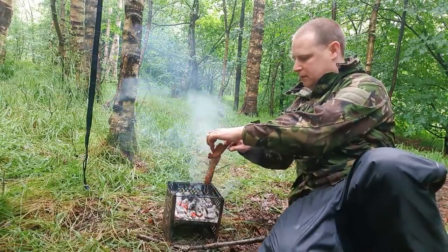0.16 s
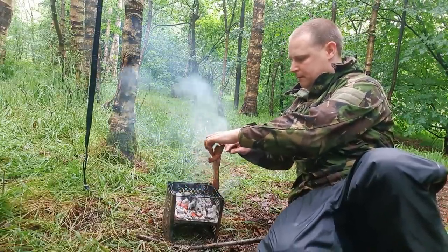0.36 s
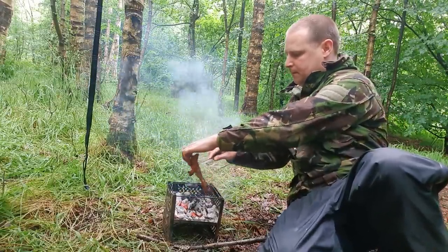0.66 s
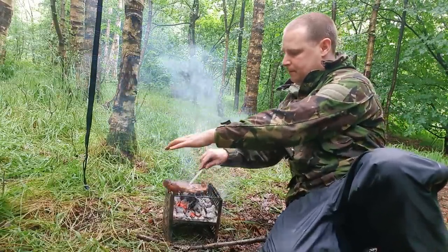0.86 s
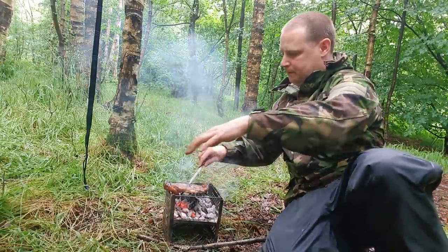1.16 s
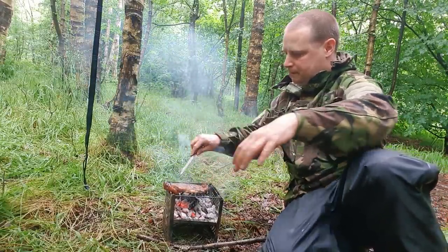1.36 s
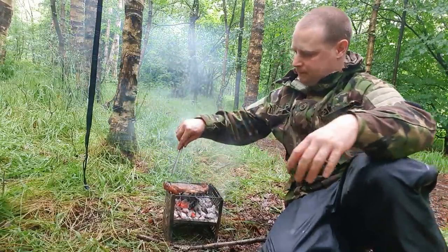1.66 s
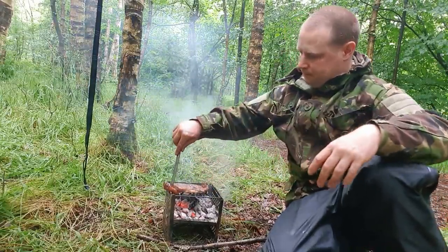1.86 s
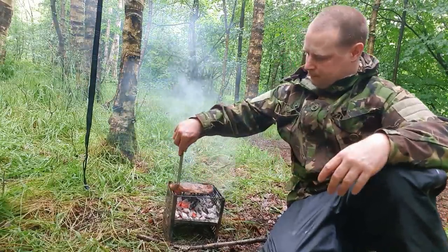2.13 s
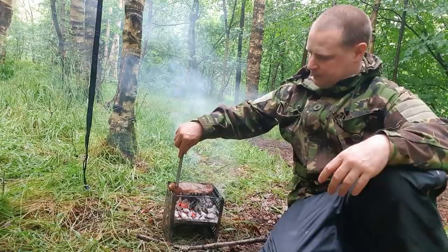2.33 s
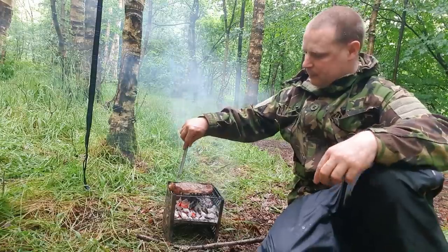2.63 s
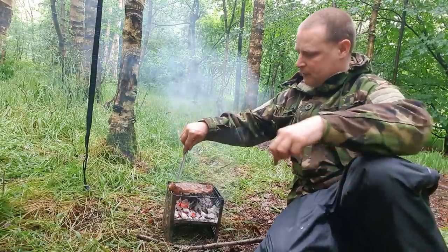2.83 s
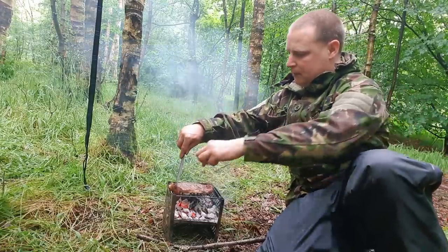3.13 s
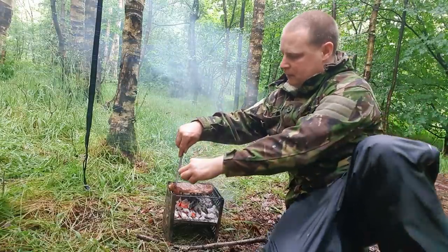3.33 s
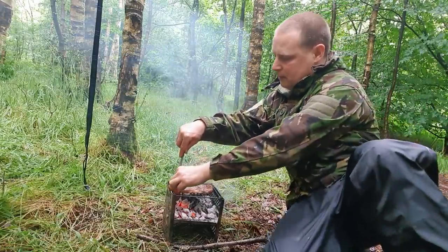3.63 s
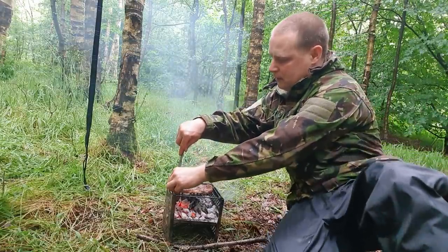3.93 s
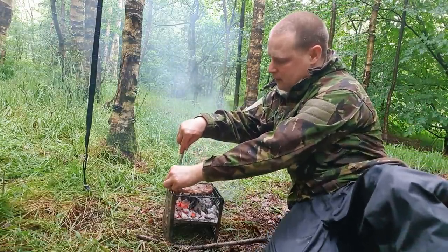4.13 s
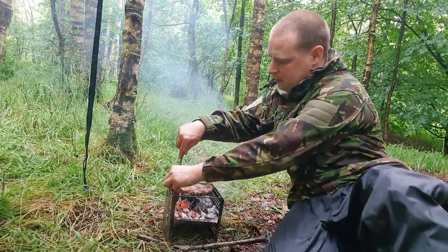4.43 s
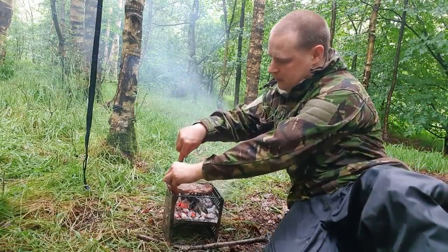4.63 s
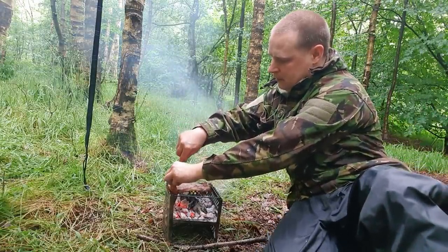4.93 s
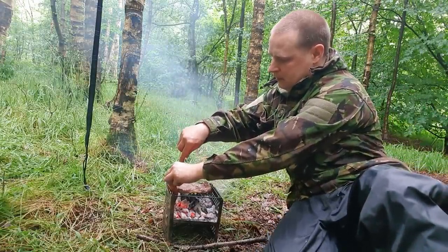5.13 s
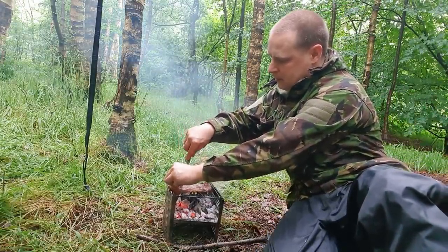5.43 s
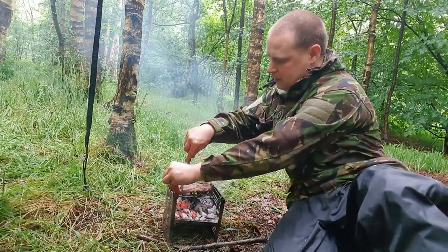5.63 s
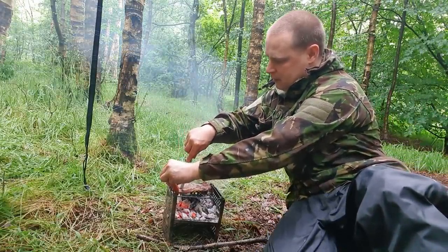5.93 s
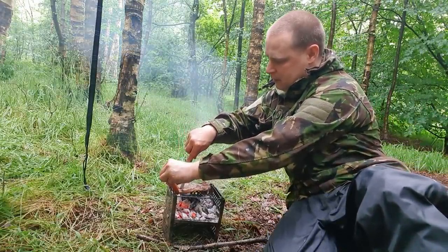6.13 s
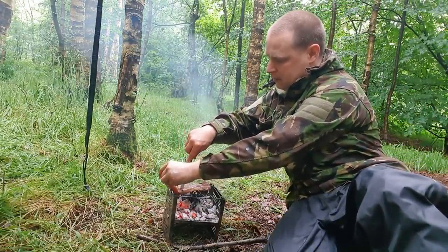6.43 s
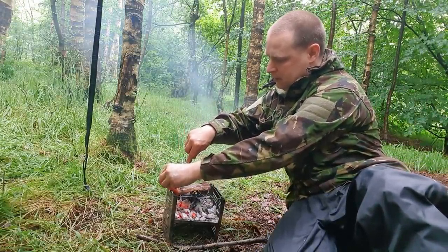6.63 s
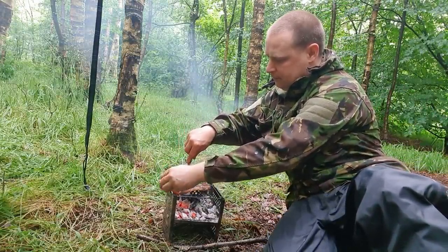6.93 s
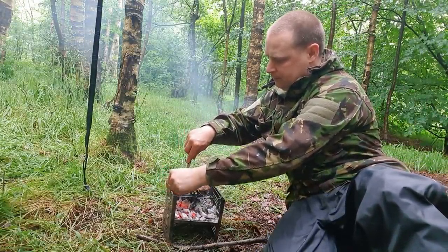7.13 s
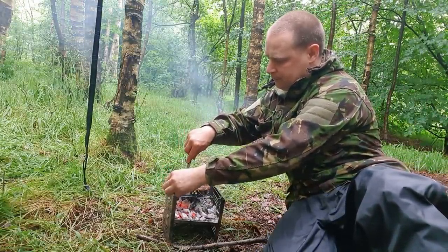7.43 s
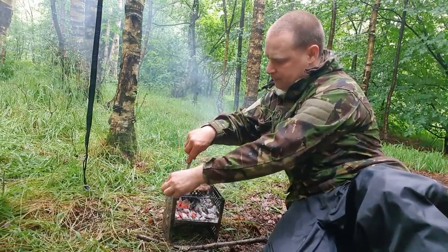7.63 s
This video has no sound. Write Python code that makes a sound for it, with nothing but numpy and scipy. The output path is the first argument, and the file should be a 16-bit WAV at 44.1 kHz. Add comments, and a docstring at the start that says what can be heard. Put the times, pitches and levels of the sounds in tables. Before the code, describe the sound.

Drops from wet trees tap irregularly on a taut tarp just above a stereo microphone in a wood. Beneath them, meat sizzles and spits softly on a small charcoal grill, with faint rain hiss and a far rumble. A soft thud comes early. A sleeve rustles once, and a distant bird whistles a few faint notes, then a few more. The hardest drip lands near the end as the sizzle fades.

```python
"""Drips from wet trees tap on a taut tarp over a stereo microphone in a wood. From the start, fine rain
hisses in the leaves over a far rumble and drone, and meat sizzles and spits on a small charcoal grill.
Something thuds softly at 1.7 s. Just after 3 s a sleeve rustles once and a distant bird whistles a few
notes, then more around 5 s. The hardest drip lands near 6.9 s, as the sizzle sinks away."""
import sys
import numpy as np
from scipy import signal
from scipy.io import wavfile

SR = 44100
rng = np.random.default_rng(int(sys.argv[2]) if len(sys.argv) > 2 else 0)


def generate_wav(signal):
    """Clip the signal to [-1, 1] and save it as 16-bit WAV at the path in sys.argv[1]."""
    frames = np.transpose(np.atleast_2d(signal))
    scaled = np.clip(frames, -1, 1) * 32767
    pcm = np.round(scaled).astype(np.int16)
    wavfile.write(sys.argv[1], SR, pcm)


N = 342657


def from_db(db):
    """Gain of a level in dB."""
    return np.exp(np.asarray(db) * (np.log(10) / 20))


def unit_rms(x):
    """Scaled to rms 1."""
    return x / np.sqrt(np.mean(x ** 2) + 1e-20)


def pan(db):
    """Left and right gains, the left louder by db."""
    return from_db([[db / 2], [-db / 2]])


def butter(x, order, hz, kind):
    """A Butterworth filter."""
    return signal.sosfilt(signal.butter(order, hz, kind, fs=SR, output="sos"), x)


def automation(rows):
    """One curve per column, sample by sample, from rows that begin with a time."""
    times, *columns = np.transpose(rows)
    return [np.interp(np.arange(N) / SR, times, column) for column in columns]


def at_hz(points, hz):
    """A curve read on a log-frequency axis."""
    freqs, values = np.transpose(points)
    return np.interp(np.log(hz), np.log(freqs), values)


def drift(rate_hz):
    """A smooth random wobble with a spread of about 1."""
    step = 40
    pole = np.exp(-2 * np.pi * rate_hz * step / SR)
    slow = signal.lfilter([1], [1, -2 * pole, pole * pole], rng.standard_normal(N // step + 2002))[2000:]
    return np.interp(np.arange(N) / step, np.arange(len(slow)), unit_rms(slow))


def grains(per_s, spread_db):
    """Two unrelated streams of random clicks of uneven size."""
    sizes = from_db(spread_db * np.minimum(rng.exponential(1, (2, N)), 5))
    signs = rng.choice([-1, 1], (2, N))
    return unit_rms(sizes * signs * (rng.random((2, N)) < per_s / SR))


def ring(t, hz, t60, phase):
    """A ringing mode that falls 60 dB in t60 seconds."""
    return np.sin(2 * np.pi * hz * t + phase) * from_db(-60 * t / t60)


# Stereo width of the beds. Each row: frequency in Hz, left-right likeness (1 is mono).
BED_LIKENESS = [(60, 0.91), (130, 0.93), (290, 0.94), (640, 0.45), (1410, -0.071), (3100, -0.058),
                (6820, -0.058), (15000, -0.024)]
# Balance of the beds. Each row: frequency in Hz, left over right in dB.
BED_PAN = [(60, -1.0), (180, -1.5), (550, 0.5), (1650, -0.5), (4970, -2), (15000, -4)]
def noise_bed(sources, spectrum, flicker_db, tilt_db=0):
    """Twenty flickering bands, each with its own level, width and pan; tilt pivots on 8 kHz; rms 1."""
    out, shared_flicker = np.zeros((2, N)), drift(6)
    edges = np.geomspace(max(spectrum[0][0], 25), 17000, num=21)
    for k, (low, high) in enumerate(zip(edges, edges[1:])):
        mid_side = butter(sources[k % 2], 2, [low, high], "band")
        hz = np.sqrt(low * high)
        alike = at_hz(BED_LIKENESS, hz)
        to_stereo = pan(at_hz(BED_PAN, hz)) * np.sqrt([[1 + alike, 1 - alike]]) * [[1, 1], [1, -0.95]]
        band_db = at_hz(spectrum, hz) + tilt_db * np.log2(hz / 8000)
        flicker = shared_flicker / 2 + drift(35)
        out += from_db(band_db + flicker_db * flicker) * (to_stereo @ mid_side)
    return unit_rms(out)


# Tone of the rumble and rain. Each row: frequency in Hz, relative level in dB.
WOOD_SPECTRUM = [(25, -12), (60, 0), (80, -0.5), (140, -14), (250, -2), (400, -8), (600, -10), (1000, -12),
                 (1500, -6), (3660, -9), (7500, -26.5), (9500, -27), (14800, -17), (17000, -42)]
# Their fader. Each row: time in seconds, level in dB.
WOOD_FADER = [(0, -56.5), (4, -56.5), (7.77, -58)]
def rain_and_rumble():
    """Fine rain hisses in the leaves, with a far rumble below."""
    level_db, = automation(WOOD_FADER)
    return from_db(level_db) * noise_bed(rng.standard_normal((2, 2, N)), WOOD_SPECTRUM, flicker_db=.3)


def far_drone(hz=208, width_hz=19.4, level_db=-66.5):
    """Noise through one narrow resonance, nearly mono."""
    radius = np.exp(-np.pi * width_hz / SR)
    poles = [1, -2 * radius * np.cos(2 * np.pi * hz / SR), radius * radius]
    mid, side = signal.lfilter([1, 0, -1], poles, rng.standard_normal((2, N)))
    return from_db(level_db) * unit_rms(mid + 0.14 * side * [[1], [-1]])


# The song. Each row: start and length in seconds, first and last pitch in Hz, level in dB.
BIRD_NOTES = [(.3, .12, 1700, 1700, -62), (3.13, .1, 2050, 1940, -59), (3.42, .13, 2850, 2800, -58),
              (3.54, .14, 2840, 2810, -59.5), (3.47, .1, 2730, 2690, -61), (3.76, .06, 2740, 2720, -59),
              (3.8, .06, 2330, 2300, -60), (3.85, .14, 2150, 2080, -58), (4.91, .085, 1950, 2040, -56.5),
              (4.95, .06, 2130, 2150, -57), (4.97, .04, 1880, 1870, -59), (5.155, .04, 2700, 2700, -59),
              (5.2, .07, 2060, 2000, -58), (5.275, .065, 2000, 2020, -55), (5.28, .12, 2850, 2800, -66),
              (5.36, .07, 2040, 2030, -62), (5.45, .06, 1980, 1850, -61), (5.52, .15, 2260, 2380, -63),
              (5.66, .08, 2490, 2520, -59), (5.695, .06, 2650, 2620, -56), (5.745, .09, 2630, 2600, -57)]
def distant_bird(wet=.7, reverb_t60_s=.3):
    """Wavering, fluttering whistles, heard directly and smeared by the trees."""
    song = np.zeros(N)
    waver = 1 + .006 * drift(15) + .018 * drift(80)
    flutter = from_db(2.5 * drift(45))
    for start, length, first_hz, last_hz, level_db in BIRD_NOTES:
        n, at = int(length * SR), int(start * SR)
        pitch = np.linspace(first_hz, last_hz, n) * waver[at:at + n]
        whistle = np.sin(2 * np.pi * np.cumsum(pitch) / SR)
        song[at:at + n] += from_db(level_db) * np.sqrt(np.hanning(n)) * whistle
    song *= flutter
    trees = rng.standard_normal((2, 12000)) * from_db(-60 * np.arange(12000) / SR / reverb_t60_s)
    trees /= np.sqrt(np.sum(trees ** 2, axis=1, keepdims=True))
    reverb = signal.fftconvolve(song[None], trees, axes=1)[:, :N]
    return np.sqrt(1 - wet ** 2) * song + wet * reverb


def soft_thud(start_s=1.663, hz=80, gain_db=-42, t60_s=.11):
    """A short low swing that swells and dies, dead centre."""
    t = np.maximum(np.arange(N) / SR - start_s, 0)
    return from_db(gain_db) * ring(t, hz, t60_s, np.pi) * (1 - np.exp(-t * hz))


# Tugs of the sleeve. Each row: time of the crest in seconds, level in dB.
SLEEVE_TUGS = [(3.2, -56), (3.239, -49), (3.279, -48), (3.313, -45.5), (3.335, -56), (3.4, -52)]
def sleeve_rustle(rise_db_per_s=900, fall_db_per_s=445):
    """Dull grains of cloth; each tug rises fast and falls slower."""
    cloth = butter(grains(1800, spread_db=2.0), 2, [120, 900], "band")
    t = np.arange(N) / SR
    envelope = sum(from_db(db + np.minimum(rise_db_per_s * (t - crest), fall_db_per_s * (crest - t)))
                   for crest, db in SLEEVE_TUGS)
    return envelope * unit_rms(cloth[0] + 0.32 * cloth * [[1], [-1]])


# The sizzle's two bright bands. Each row: centre in Hz, width in Hz.
SHEEN_BANDS = [(7800, 1000), (15300, 670)]
def sheen(fat, low_db, top_db):
    """The crackle of fat gathers in two flickering bands, a little to the left."""
    out = np.zeros((2, N))
    for crackle, (hz, width_hz), level_db in zip(fat, SHEEN_BANDS, (low_db, top_db)):
        band = unit_rms(butter(crackle, 2, [hz - width_hz / 2, hz + width_hz / 2], "band"))
        out += from_db(level_db + 1.5 * drift(40)) * band
    return out * pan(2.8)


# Tone of the sizzle. Each row: frequency in Hz, relative level in dB.
SIZZLE_SPECTRUM = [(1200, -43), (2500, -7.5), (4500, -4.5), (6500, -1.5), (7900, 1), (8600, -3.5),
                   (9700, -1), (11200, -2.5), (12500, -5), (15200, 3.5), (17000, -10)]
# How the sizzle moves. Each row: time in seconds, level in dB, tilt in dB per octave,
# lower sheen band in dB against that level.
SIZZLE_MOVES = [(0.0, -50.5, -1.5, -10), (.1, -49.5, -0.5, -6), (0.24, -52.5, -2.5, -10),
                (0.52, -51, -1.5, -21), (0.84, -46, -1, -13), (1.04, -48, -1, -19), (2.14, -51, -0.5, -19),
                (3.05, -53.5, -1.5, -16), (3.31, -51.5, -2, -15), (3.66, -54.5, -3, -8),
                (3.89, -54.5, -2.5, -12), (4.35, -49.5, -1, -18), (4.7, -53.5, -3.5, -14),
                (5.13, -56, -3, -24), (5.42, -57, -3.5, -15), (5.72, -54, -2, -36), (6.34, -54, -1, -18),
                (6.9, -57, -3, -27), (7.25, -59, -4.5, -24), (7.77, -61, -5.5, -16)]
def grill_sizzle():
    """Fat frying on the grill: thousands of tiny clicks a second merge into a bright hiss."""
    level_db, tilt_db, sheen_db = automation(SIZZLE_MOVES)
    fat = [grains(8000, spread_db=2.5) for _ in range(2)]
    hiss = noise_bed(fat, SIZZLE_SPECTRUM, flicker_db=1.5, tilt_db=tilt_db)
    return from_db(level_db) * (hiss + sheen(fat, low_db=sheen_db, top_db=tilt_db - 17))


# Spits that stand out of the sizzle. Each row: start in seconds, level in dB.
LOUD_SPITS = [(0.2693, -48), (.615, -45), (0.711, -41), (0.779, -48), (0.825, -31), (0.837, -32),
              (0.86, -30), (1.044, -41), (1.146, -40), (1.538, -46), (2.5715, -46), (3.087, -44),
              (6.236, -40), (6.243, -40), (6.256, -43), (6.666, -46)]
def fat_spits(faint_count, loud_rise_s=.0013, faint_rise_s=.0003):
    """Fat spits in short bursts of bright noise; faint ones fall at random and ride the sizzle's level."""
    out, t = np.zeros((2, N + 500)), np.arange(500) / SR
    times, sizzle_db = np.transpose(SIZZLE_MOVES)[:2]
    starts, chance = rng.random((faint_count, 2)).T * [[N / SR], [1]]
    faint_db = np.interp(starts, times, sizzle_db) + 5.5 - 2.5 * np.log(np.maximum(chance, .1))
    for spits, rise in ((LOUD_SPITS, loud_rise_s), (zip(starts, faint_db), faint_rise_s)):
        envelope = t / rise * np.exp(1 - t / rise)
        for start, level_db in spits:
            at = round(start * SR)
            out[:, at:at + len(t)] += from_db(level_db) * envelope * rng.standard_normal((2, len(t)))
    return butter(out[:, :N] * pan(-2.5) + 1e-18, 2, 4000, "high")


# Early reflections. Each row: delay in seconds, gain in dB.
REFLECTIONS = [(.0033, -9), (.0058, -19), (.0085, -22), (.0125, -26)]
def with_reflections(direct):
    """Ground and trunks throw a drip back, duller and with the sides swapped."""
    out = direct.copy()
    for delay, gain_db in REFLECTIONS:
        lag = int(delay * SR)
        out[:, lag:] += from_db(gain_db) * signal.lfilter([.6], [1, -.4], direct[::-1, :-lag])
    return out


def treble_pan(hz):
    """The higher a drip's partial, the further right it sits, by up to 1 dB."""
    return pan(-min(hz / 7000, 1))


# Tap, knock, crack and snap, the partials tuned by the spot struck. Each row: gain in dB, t60 in seconds.
SPOT_PARTIALS = [(12, 0.012), (11.5, 0.007), (13, 0.0077), (5.5, 0.0059)]
# Tarp modes that every drip shares. Each row: pitch in Hz, gain in dB, t60 in seconds.
TARP_MODES = [(410, 10, 0.0071), (1100, 5.5, 0.012), (4080, 11, 0.0039), (5400, 12.5, 0.0026),
              (6170, 7.5, 0.0049), (7110, 8, 0.004), (10920, 8, 0.0022), (15000, 0, 0.002)]
# EQ points on those modes, in Hz: sag, tap, knock, crack, snap, spray.
TARP_EQ_HZ = [330, 1300, 2200, 3300, 6500, 12000]
def drip(skin_hz, skin_t60, spot_hz, colour_db, scatter):
    """One drop strikes: the tarp's skin swings, the sheet bounces, its modes ring, a splash dies away."""
    t = np.arange(2600) / SR
    out = np.zeros((2, len(t)))
    crack_db, snap_db = colour_db[3:]
    swing_up = 1 - np.exp(-t / (.082 * skin_t60))  # slack skin swings up slowly
    out += ring(t, skin_hz, max(skin_t60, .004), 0) * swing_up
    out += from_db(-21) * ring(t, hz=95, t60=.026, phase=0)  # the whole sheet bounces
    for hz, own_db, (gain_db, t60) in zip(spot_hz, colour_db[1:], SPOT_PARTIALS):
        phase = np.array([[0], [hz / 6000]])
        out += from_db(gain_db + own_db) * treble_pan(hz) * ring(t, hz, t60, phase)
    spray_db = -7.5 + .36 * snap_db
    for (hz, gain_db, t60), (detune, scatter_db, left, right) in zip(TARP_MODES, scatter):
        eq_db = np.interp(np.log(hz), np.log(TARP_EQ_HZ), [*colour_db, spray_db])
        gain = from_db(gain_db + eq_db + scatter_db) * treble_pan(hz)
        phase = np.array([[left], [right]]) * min(hz / 8000, 1.1)  # short waves differ between the sides
        out += gain * ring(t, hz * (1 + .02 * detune), t60, phase)
    splash = signal.lfilter([.35, .35], [1, -.3], rng.standard_normal((2, len(t))))
    splash_db, splash_t60 = max(crack_db, snap_db) - 6.5, .057
    out += from_db(splash_db - 60 * t / splash_t60) * splash
    attack = 1 - np.exp(-t / (.032 * skin_t60))
    return with_reflections(out * attack)


def place_drips(rows, start_offset_s=.003):
    """Each drip sounds 3 ms after its listed start, placed by level and by a lead on one side."""
    out = np.zeros((2, N + 4000))
    scatters = rng.standard_normal((len(rows), len(TARP_MODES), 4))
    for row, scatter in zip(rows, scatters):
        start, level_db, skin_hz, *spot_hz, skin_ms = row[:8]
        *colour_db, pan_db = row[8:]
        sound = from_db(level_db) * pan(pan_db) * drip(skin_hz, skin_ms / 1000, spot_hz, colour_db, scatter)
        lead_s = np.clip(.00008 * (pan_db + 2.5), -.0003, .0003)
        for side, shift in enumerate((-lead_s / 2, lead_s / 2)):
            at = round((start + start_offset_s + shift) * SR)
            out[side, at:at + sound.shape[1]] += sound[side]
    thinned = butter(out[:, :N] + 1e-18, 1, 180, "high")  # a thin sheet radiates little bass
    return butter(thinned, 1, 60, "high")


def far_drips(count):
    """Faint random drips on the far tarp and the leaves, in rows laid out like NEAR_DRIPS."""
    lowest = np.array([0, -56, 400, 900, 1750, 2600, 4500, 12, -24, -24, -18, -20, -18, -4])
    span = [N / SR, 10, 600, 700, 700, 1500, 3500, 4, 8, 8, 8, 8, 8, 5]
    return place_drips(lowest + rng.random((count, 14)) * span)


# The featured drips. Each row: start in seconds, level in dB, pitches of skin, tap, knock, crack and snap
# in Hz, skin t60 in ms, colour of sag, tap, knock, crack and snap in dB, left over right in dB.
NEAR_DRIPS = [(0.515, -37, 636, 1450, 2170, 3950, 6960, 9.2, -19, -17, -20.0, -20, -12, 0.5),
              (0.565, -30.5, 700, 1110, 2130, 3060, 7550, 13, -12, -19.5, -14, -13, -30, 1),
              (0.666, -17, 674, 1010, 2440, 3420, 5750, 6.8, -17, -27, -43, -18.5, -5, -3.5),
              (0.843, -17, 724, 1350, 2310, 4200, 5950, 2.7, -45, -14, -44, -22.5, 0.5, -5),
              (1.691, -43.5, 810, 1210, 2360, 2820, 4530, 13, -27, -15, -4, -1, -18.0, -2),
              (1.748, -42, 600, 1100, 1900, 3000, 6000, 11, -10, -22, -24, -24, -24, -1),
              (1.812, -48, 385, 1650, 1900, 3120, 5760, 14.2, -33, -27.0, 1, -3, -2, 8.5),
              (1.913, -41.0, 590, 1130, 2440, 2860, 6340, 24, -12, -17, -21.0, -6, -15.0, 1.5),
              (1.993, -34, 970, 1260, 1750, 2870, 7240, 16, -12, -16.5, -20, -22.0, -23.0, 0.0),
              (2.2, -25.5, 480, 1490, 1980, 3550, 6900, 12.6, -29, -19, -6.5, -20, -11.5, 1.5),
              (2.375, -28, 413, 960, 2400, 3440, 6750, 16, -35, -21.5, -14, -25, -9, 1),
              (2.517, -8.5, 770, 1275, 2080, 3220, 7850, 3.5, -46, -19, -25, -15.5, -13, -2.0),
              (2.659, -36, 426, 900, 1780, 3900, 7900, 12, -29, -14.5, -12.0, -9.5, -10, -0.5),
              (2.809, -40.5, 781, 1170, 2230, 2970, 7190, 14, -18.0, -17, -25.0, -13, -6, 0),
              (2.862, -34, 407, 1490, 1880, 3100, 7960, 8.3, -29, -25, -11, -18, -17, 4),
              (2.968, -40, 556, 900, 2380, 2800, 7710, 13.0, -17, -15, -14, -12, -21.0, 1.0),
              (3.117, -40, 600, 1410, 1810, 3000, 7910, 9.9, -19, -13, -13, -14, -16.0, -1.5),
              (3.175, -33, 395, 1290, 1910, 3610, 4850, 9.9, -31, -15.5, -9, -15, -11.0, 0),
              (3.232, -34.5, 545, 1250, 1750, 3130, 7520, 6, -38, -12, -8, -16, -26.0, 0),
              (3.275, -18.5, 463, 1220, 2360, 3550, 6230, 19, -22, -38, -28, -18.5, -19.5, 0.5),
              (3.307, -29, 694, 1590, 1730, 3690, 7740, 15, -27, -16, -13, -36.0, -30.0, -0.5),
              (3.656, -21.5, 710, 1930, 2270, 2950, 4830, 10, -8.5, -19.5, -14, -21, -11.5, -4),
              (3.859, -33, 1160, 1550, 1780, 3130, 5960, 15, -9.5, -16, -14, -18, -4.5, -1.5),
              (3.975, -28.5, 616, 1070, 2390, 2840, 6420, 13, -32, -20.5, 0, -14, -18, 1),
              (3.99, -16, 637, 906, 2800, 3180, 4240, 5.9, -22, -24, -15, -15, -16, -1.5),
              (4.114, -36, 830, 1240, 1940, 3010, 6350, 14, -17, -10.5, -24, -27, -27.0, -6),
              (4.137, -27, 483, 910, 1750, 2650, 6010, 18, -30, -22.5, -31, -10, -21, 0.5),
              (4.241, -41.5, 800, 1550, 2000, 3300, 6000, 8.7, -17, -9, -22, -11, -18, 0),
              (4.545, -23, 443, 1600, 2070, 2490, 6460, 29, -11, -31, -9, -15, -10.5, -3.5),
              (4.917, -46, 900, 1500, 1840, 2900, 4500, 8.4, -17, -9.5, -4, -19, -20, -1),
              (5.272, -46, 700, 1400, 1800, 2900, 5000, 8.7, -16, -12, -9, -18, -20, -1.5),
              (5.888, -27, 533, 1600, 1820, 2620, 4970, 9.7, -18, -15, -10.5, -19, -8, 1),
              (5.961, -42.5, 393, 1580, 1860, 2640, 5920, 14.0, -24.5, -28, -11, -18.0, -16.0, -1.5),
              (6.165, -17, 1030, 1370, 3220, 3840, 6350, 4.9, -21.5, -16, -16, -17.5, -13, 1.5),
              (6.309, -10, 603, 1275, 2150, 3030, 6400, 8, -17.5, -17.5, -17, -18.5, -8, -1),
              (6.347, -31, 1140, 1550, 1820, 3380, 6540, 9.6, -12, -7.5, -25.0, -14, -7, 0.5),
              (6.367, -24, 720, 940, 2280, 2740, 5430, 8.4, -16, -29, -10, -16, -20, 0.5),
              (6.495, -39.5, 705, 1100, 1870, 4380, 7080, 19, -16, -16, -24.0, -24, -16, 1.0),
              (6.765, -41, 427, 1390, 1750, 3300, 7980, 11, -13, -12.5, -16, -11, -4, -4),
              (6.862, -2, 655, 910, 2320, 2910, 6100, 5.6, -46, -24, -17.5, -17, -13, -1.5),
              (6.906, -30.5, 714, 1630, 1710, 2850, 5920, 12, -17, -26, -7, -6.5, -8.5, -4),
              (7.179, -35, 374, 1020, 2190, 2830, 4860, 17, -26.5, -27.0, -7.5, -5, -12, -3.5),
              (7.35, -31, 760, 970, 2190, 2820, 5290, 10, -25, -25, -21, -16.5, -24, 1),
              (7.413, -41, 1100, 1510, 1750, 4220, 4540, 12, -16, -14, -25.0, -20, -5, 0),
              (7.476, -46, 393, 1010, 2000, 2920, 7100, 8.6, -24.0, -16, -10, -25.0, 2, -3),
              (7.687, -41.5, 1130, 1650, 1760, 3670, 4500, 12.2, -9, -17, -8, -10, -9, -2.5)]
def near_drips():
    """Drops from the wet trees hit the taut tarp right above the microphone."""
    return place_drips(NEAR_DRIPS)


def scene():
    """The stereo mix: drips in front, the grill nearby, the wood behind."""
    drips = near_drips() + far_drips(count=60)
    grill = grill_sizzle() + fat_spits(faint_count=150)
    wood = rain_and_rumble() + far_drone() + distant_bird()
    return drips + grill + wood + soft_thud() + sleeve_rustle()


def record(dry, dip_hz=9500, cutoff_hz=15500):
    """The microphone housing partly cancels one treble band; the top is cut steeply."""
    b, a = signal.iirpeak(dip_hz, Q=5.0, fs=SR)
    coloured = dry - 0.43 * signal.lfilter(b, a, dry)
    return signal.sosfilt(signal.ellip(10, 1, 70, cutoff_hz, fs=SR, output="sos"), coloured)


dry = scene()
out = record(dry)
generate_wav(out)
```